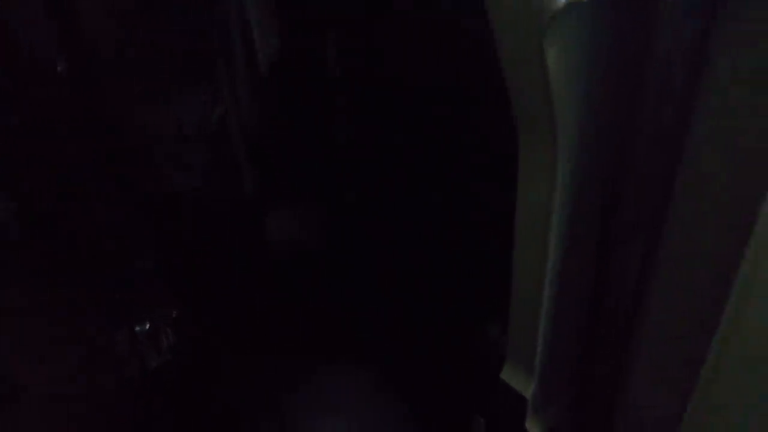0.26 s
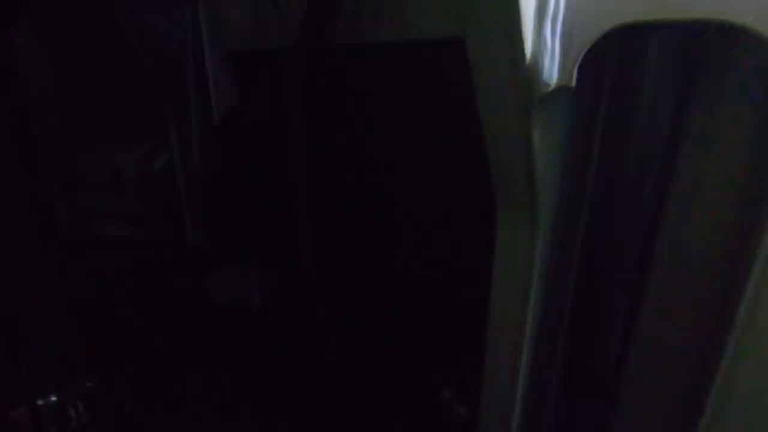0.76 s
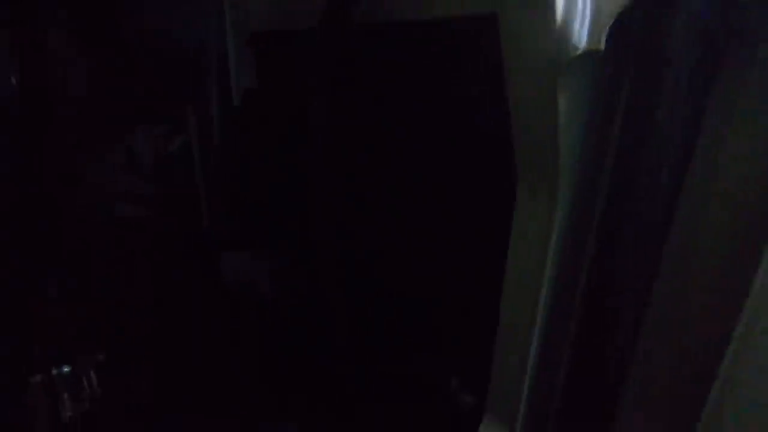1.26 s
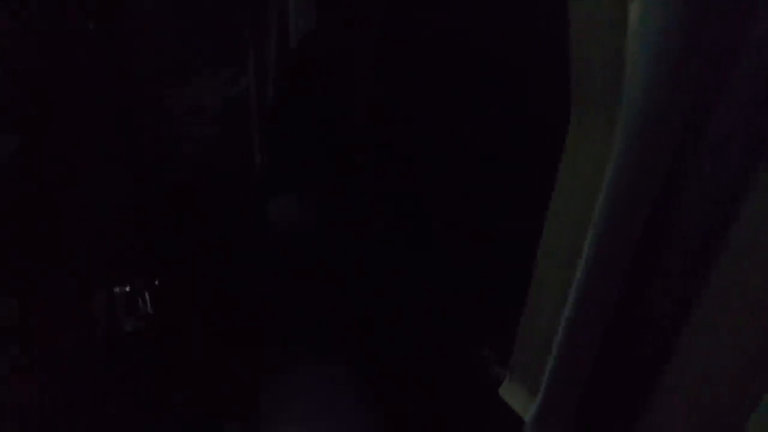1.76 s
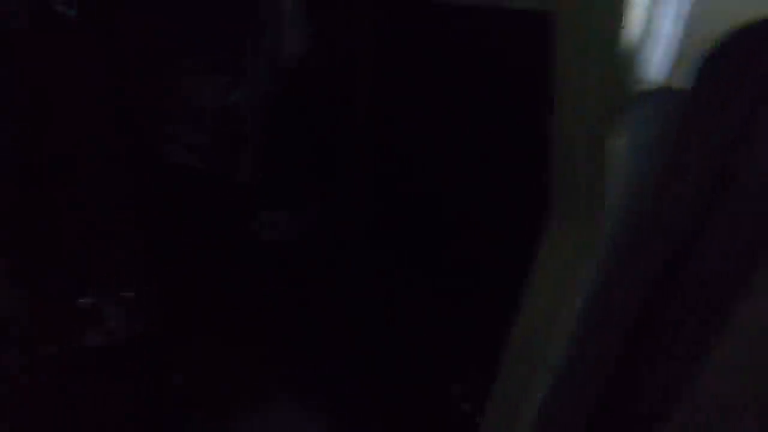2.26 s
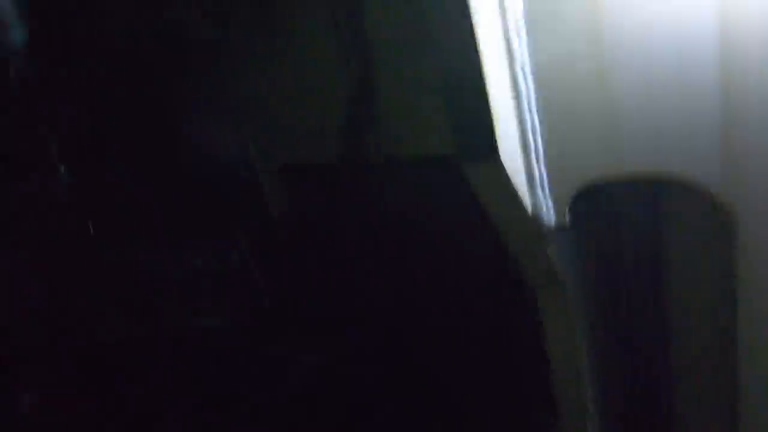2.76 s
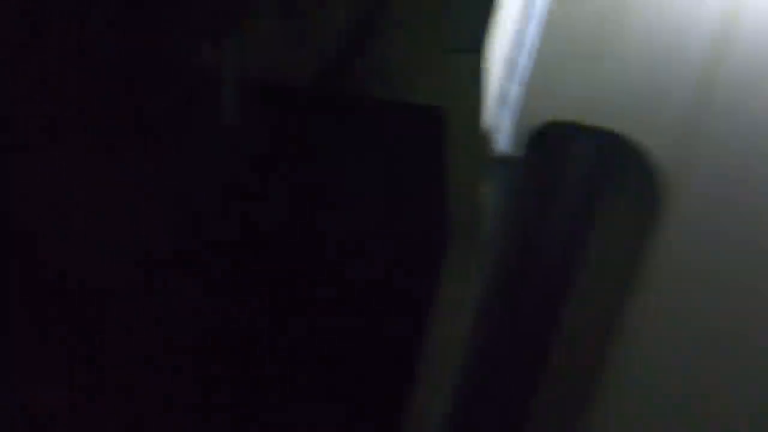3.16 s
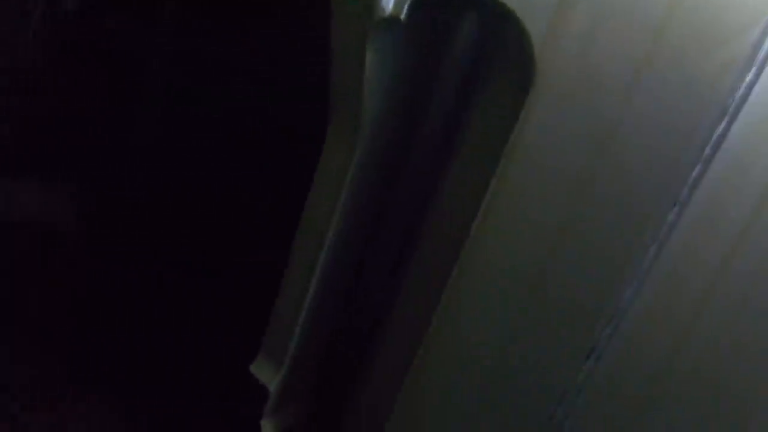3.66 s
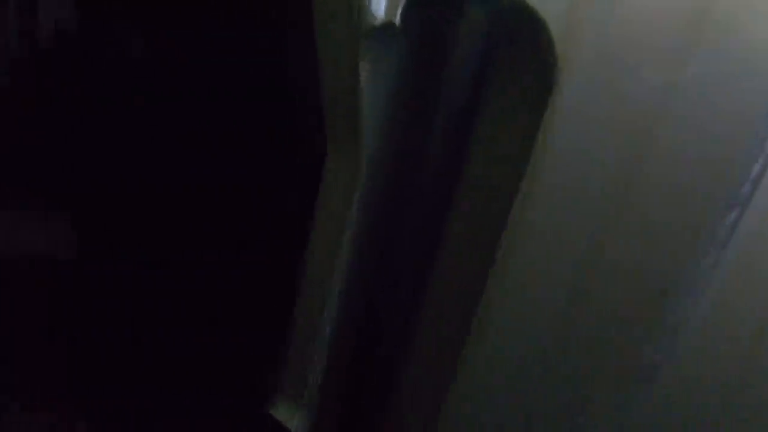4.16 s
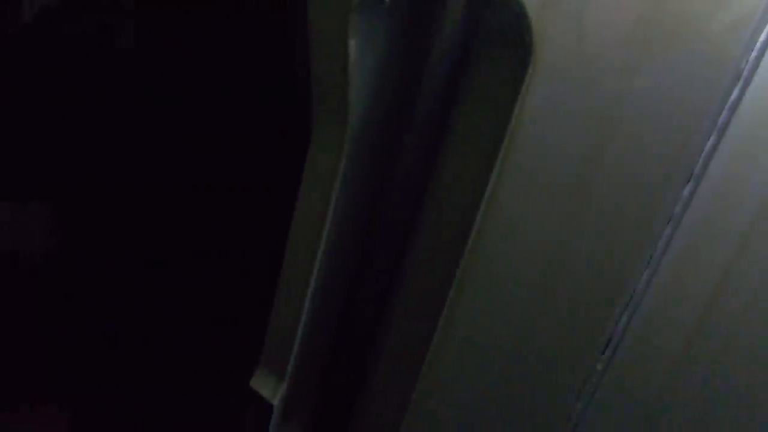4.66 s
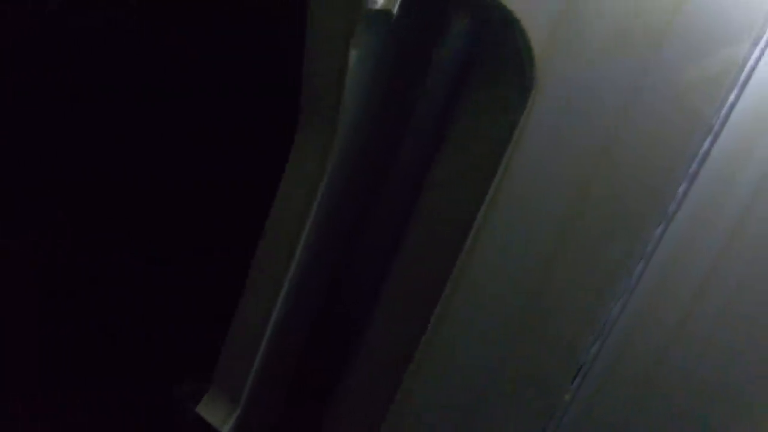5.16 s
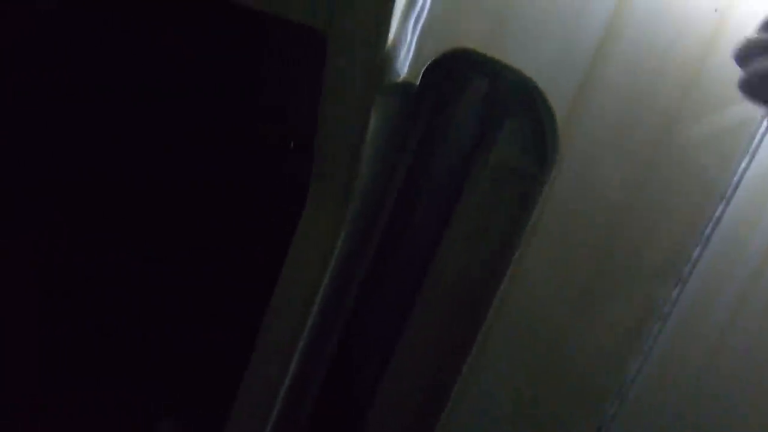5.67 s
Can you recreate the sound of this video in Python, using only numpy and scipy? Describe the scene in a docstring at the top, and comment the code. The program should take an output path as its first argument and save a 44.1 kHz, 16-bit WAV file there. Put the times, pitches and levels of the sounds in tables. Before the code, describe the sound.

Inside a ship's engine room, a diesel runs at constant speed with a strong, deep hum that booms through the steel. A slight throb and light clatter ride on it, along with humming machinery, droning fans, rumbling deck plates and roaring ventilation. Faint gear whine and a thin hiss of air sit above. As the microphone moves slowly through the room, single tones swell and fade while the main hum holds.

```python
"""Ship's engine room: a diesel at a steady 900 rpm, its firing tone booming through the steel hull.
Uneven cylinders add a throb and a clatter that repeats each cycle. Machinery hums, a fan drones, gears
whine, deck plates rumble, ventilation roars and leaking air hisses. The microphone moves slowly through
the room's standing waves, so single tones swell and fade."""
import sys
import numpy as np
from scipy import signal
from scipy.fft import rfft, irfft, next_fast_len
from scipy.io import wavfile
from scipy.ndimage import uniform_filter1d, minimum_filter1d, map_coordinates

SR = 44100
rng = np.random.default_rng(int(sys.argv[2]) if len(sys.argv) > 2 else 0)


def log_audio(samples):
    """Write samples as a 16-bit WAV file to the path given in sys.argv[1]."""
    # one column per channel
    frames = np.atleast_2d(samples).T
    # limit to full scale, then quantise
    limited = np.clip(frames, -1, 1)
    pcm = np.round(limited * 32767).astype(np.int16)
    wavfile.write(sys.argv[1], SR, pcm)


N = 261071
TIME_S = np.arange(N) / SR
FIRING_HZ, FIRINGS_PER_CYCLE = 89.88, 12
CYCLE_HZ = FIRING_HZ / FIRINGS_PER_CYCLE

# microphone path: t/s, position (0 = air leak and motor, 1 = fan duct)
MIC_PATH = [(0, 0.089), (.8, 0.037), (2.35, 0.8), (3.25, 0.6), (3.95, 0.74), (5.2, 1), (5.92, 1)]
# strong diesel lines: order (multiple of CYCLE_HZ), base level/dB
DIESEL_ORDERS = [(6, -53.5), (9, -49.6), (10, -57.4), (12, -23.9), (13, -55), (14, -59.5), (15, -46.2),
                 (18, -49.2), (19, -54.7), (21, -44), (22, -56), (27, -49.5), (32, -59), (33, -57.5),
                 (34, -55.3), (36, -52.5), (42, -57.6), (43, -59.5), (44, -60), (47, -58), (48, -56),
                 (50, -60.5), (52, -58.5), (54, -59.5), (58, -62), (66, -62.5), (89, -64)]
# nodes and antinodes along the path: t/s, lower order gain/dB, upper order gain/dB
STANDING_WAVE_GAINS = [(0, -3.5, -3), (.9, 2, 0), (1.75, -3, -5), (2.1, 2, -1), (2.6, -3.5, -4),
                       (3.15, -13, 2), (3.45, -5, 5), (3.75, -3, 3), (4.05, 1.5, 4.5), (4.55, 2.5, -3),
                       (4.9, 2, 4.5), (5.25, 3, 2), (5.7, -1.5, -3), (5.92, -3, -6)]
# hull plate booms: t/s, rise/dB
HULL_BOOMS = [(0.165, 7), (2.025, 6), (2.145, 7), (2.3, 7), (2.42, 7), (2.555, 9), (4.04, 5), (4.78, 6)]
# clatter spectrum: f/Hz, level per order/dB
CLATTER_SPECTRUM = [(20, -76), (70, -65), (200, -62.5), (380, -64), (480, -66), (620, -66.5), (850, -72),
                    (1100, -76), (1500, -82), (2200, -100), (4000, -130)]

# fan blade tone: t/s, level/dB
BLADE_LEVEL = [(0, -66), (.6, -57.5), (1.9, -60.5), (2.4, -56), (3.5, -54), (4.15, -50.5), (4.8, -53),
               (5.92, -57.5)]
# fan outlet rush: t/s, level/dB
OUTLET_RUSH_LEVEL = [(0, -58), (.6, -55), (1.9, -54.5), (2.6, -53.5), (2.9, -47.5), (3.4, -52.5),
                     (4.3, -52.5), (5.0, -52), (5.4, -66.5), (5.85, -54)]
# outlet resonances: f/Hz, width/Hz, gain/dB
OUTLET_MODES = [(455, 83, 0.5), (590, 90, -2.5), (753, 140, -0.5)]
# duct drone: t/s, level/dB
DUCT_DRONE_LEVEL = [(0, -55.5), (2.3, -56), (2.85, -55.5), (3.3, -47.5), (3.75, -55), (5.1, -45),
                    (5.92, -49)]
# duct resonances: f/Hz, width/Hz, gain/dB
DUCT_MODES = [(191, 32, -1.5), (380.4, 70, 6), (456, 27, -3.5), (496.6, 20, 0.5)]

# gear whines: f/Hz, gain/dB
GEAR_LINES = [(1668, 0), (1709, -4), (2213, -11), (1170, -8)]
# gear whine envelope: t/s, level/dB
GEAR_WHINE_LEVEL = [(0, -72), (.7, -69), (.9, -63.5), (1.35, -65), (1.6, -71), (5.2, -71), (5.55, -63.5),
                    (5.92, -69)]
# gear casing resonances: f/Hz, width/Hz, gain/dB
CASING_MODES = [(715, 35, 0.5), (990, 90, -3), (1200, 180, -1.5), (1600, 180, -6), (1760, 110, -9.5),
                (1960, 180, -8.5)]
# casing surges: t/s, half length/s, rise/dB
CASING_SURGES = [(0.885, 0.23, 8), (5.624, .2, 4)]
# steady machinery hum tones: f/Hz, level/dB
HUM_LINES = [(70.8, -59), (94.1, -54), (148.1, -56), (178.5, -51.5), (198.2, -54), (316.2, -51),
             (353.3, -55), (592.6, -61.5), (630, -64), (948.6, -67)]
# machinery rushes: t/s, half length/s, f/Hz, width/Hz, level/dB
RUSH_BANDS = [(.15, 0.5, 1230, 700, -54.5), (0.23, 0.18, 282, 100, -42.5), (0.498, .5, 715, 70.3, -52.5),
              (0.778, .22, 1145, 807, -57.5), (1.403, 1.1, 579, 110.6, -55.5), (1.95, 0.27, 223, 45, -47),
              (2.146, 0.17, 1170, 248, -54), (2.299, 0.48, 163.8, 26.2, -46.5),
              (2.848, 0.38, 286.4, 35, -46.5), (2.85, 0.23, 1220, 117.5, -57.5),
              (4.203, 0.54, 267, 99, -47.5), (4.899, .3, 850, 299, -56.5), (5.45, 0.27, 211.6, 45, -42.5),
              (5.802, .25, 1150, 890, -55.5)]

# deck plate rumble: t/s, level/dB
DECK_LEVEL = [(0, -42.5), (1.6, -51.5), (2.3, -53.5), (2.95, -58.5), (3.4, -48), (4.0, -39), (5.45, -46),
              (5.92, -54)]
# deck plate resonances: f/Hz, width/Hz, gain/dB
DECK_MODES = [(144, 15, 1.5), (174.3, 11, -2), (216, 57, 1)]
# rumble swells: t/s, half length/s, plate level/dB, sub-bass level/dB
DECK_SWELLS = [(0.183, 0.076, -38.5, -66.5), (2.02, 0.022, -41, -42), (2.556, 0.05, -35.5, -58),
               (2.999, 0.15, -54, -47)]
# sub-bass of the swells: f/Hz, width/Hz, gain/dB
SUB_BAND = [(32, 24, 0)]

# ventilation roar: f/Hz, relative density/dB
ROAR_SPECTRUM = [(15, -6.5), (35, -7.5), (65, 3), (120, 1), (230, -1), (290, -7), (380, -1.5), (440, -15.5),
                 (650, -11.5), (860, -14), (1000, -15), (1800, -22), (2800, -30), (4500, -72)]
# air hiss: f/Hz, relative density/dB
HISS_SPECTRUM = [(1200, -9), (2500, 6), (3700, 3.5), (4500, 0), (5300, 2), (6000, 1.5), (6780, -5.5),
                 (7050, -10), (8500, -20), (10200, -36), (10900, -44.5), (15000, -40.5)]
# hiss envelope: t/s, base level/dB
HISS_ENVELOPE = [(0.05, -64.5), (0.1, -64), (4.64, -66.5), (5.85, -66.5)]


def from_db(db):
    """Decibels to gain."""
    return 10 ** (np.asarray(db) / 20)


def unit_rms(x):
    """Scale to rms 1."""
    return x / np.sqrt(np.mean(x ** 2) + 1e-20)


def curve(rows, column=1):
    """One column of a time table at every sample."""
    columns = np.transpose(rows)
    return np.interp(TIME_S, columns[0], columns[column])


def spectrum_db(points, hz):
    """Interpolate a spectrum over log frequency."""
    knots_hz, levels_db = np.transpose(points)
    return np.interp(np.log(np.maximum(hz, 1)), np.log(knots_hz), levels_db)


def bump(centre_s, half_s):
    """Gaussian of height 1."""
    return np.exp(-((TIME_S - centre_s) / half_s) ** 2)


def mic_gain(leak_db, duct_db):
    """Gain sliding in dB between the two ends of the microphone path."""
    return from_db(leak_db + (duct_db - leak_db) * curve(MIC_PATH))


def drift(rate_hz, hop=100, settle=2000):
    """Slow random wander, spread 1."""
    pole = np.exp(-2 * np.pi * rate_hz * hop / SR)
    white = rng.standard_normal(N // hop + settle + 2)
    slow = signal.lfilter([1], [1, -2 * pole, pole * pole], white)[settle:]
    return np.interp(np.arange(N) / hop, np.arange(len(slow)), unit_rms(slow - slow.mean()))


def tone(hz, wander_hz, waver_db):
    """Rotating machine's line, wavering in speed and level; rms 1."""
    turns = np.cumsum(hz + wander_hz * drift(2.0)) / SR + rng.random()
    return unit_rms(np.sin(2 * np.pi * turns) * from_db(waver_db * drift(0.71)))


def resonate(modes):
    """Resonances driven by random vibration; rms 1."""
    out = np.zeros(N)
    for hz, width_hz, db in modes:
        band = signal.butter(2, [hz - width_hz / 2, hz + width_hz / 2], "band", fs=SR, output="sos")
        out += from_db(db) * unit_rms(signal.sosfilt(band, rng.standard_normal(N)))
    return unit_rms(out)


def room_noise(spectrum, ripple_db, spacing_hz):
    """Turbulent noise, its spectrum rippled by standing waves; rms 1."""
    size = next_fast_len(N)
    hz = np.arange(size // 2 + 1) * SR / size
    white = rfft(rng.standard_normal(size))
    ripple = np.interp(hz / spacing_hz, np.arange(N), rng.standard_normal(N))
    colour = from_db(spectrum_db(spectrum, hz) + ripple_db * ripple)
    return unit_rms(irfft(white * colour, size)[:N])


def engine_cycles(speed_spread):
    """Four-stroke cycles elapsed under a tight governor."""
    return rng.random() + np.cumsum(CYCLE_HZ * (1 + speed_spread * drift(0.91))) / SR


def diesel_hum(cycles, throb_orders=(9, 12, 15), thud_orders=(15, 18, 21), thud_lead_cycles=0.125):
    """Firing tone plus orders of uneven cylinders; phase-aligned groups throb and thud."""
    hull_db = sum(db * bump(at_s, half_s=0.028) for at_s, db in HULL_BOOMS)
    extra_db = {21: curve(STANDING_WAVE_GAINS, 1) + hull_db,  # a hull plate is tuned to this order
                27: curve(STANDING_WAVE_GAINS, 2)}
    out = np.zeros(N)
    for order, level_db in DIESEL_ORDERS:
        gain = from_db(level_db + extra_db.get(order, 0))
        phase_turns = rng.random()
        if order in throb_orders:
            phase_turns = 0
        if order in thud_orders:
            phase_turns = thud_lead_cycles * (order - thud_orders[0])
        out += np.sqrt(2) * gain * np.cos(2 * np.pi * (order * cycles + phase_turns))
    return out


def diesel_clatter(cycles, size=4096):
    """Valve and injector knocks, smeared by the room into a per-cycle pattern varying with position."""
    orders = np.arange(size // 2 + 1)
    weak = ~np.isin(orders, np.round(np.array(DIESEL_ORDERS)[:, 0])) & (orders > 0)
    colour = from_db(spectrum_db(CLATTER_SPECTRUM, orders * CYCLE_HZ)) * weak
    phasors = np.exp(2j * np.pi * rng.random((2, len(orders))))
    patterns = irfft(colour * phasors, size) * size / np.sqrt(2)
    at_leak, at_duct = (map_coordinates(p, [cycles % 1 * size], mode="grid-wrap") for p in patterns)
    blend_rad = curve(MIC_PATH) * np.pi / 2
    return np.cos(blend_rad) * at_leak + np.sin(blend_rad) * at_duct


def shaft():
    """Low hum at the rotation rate, louder by the motor."""
    return mic_gain(-42.5, -49.5) * tone(hz=59.2, wander_hz=0.056, waver_db=0.5)


def fan():
    """Blade tone, air rushing from the outlet and duct drone."""
    blades = from_db(curve(BLADE_LEVEL)) * tone(hz=478.4, wander_hz=0.5, waver_db=0.7)
    outlet = from_db(curve(OUTLET_RUSH_LEVEL)) * resonate(OUTLET_MODES)
    duct = from_db(curve(DUCT_DRONE_LEVEL)) * resonate(DUCT_MODES)
    return blades + outlet + duct


def gearbox(surge_db):
    """Thin gear whines and a ringing casing that surges briefly."""
    whine = sum(from_db(db) * tone(hz, wander_hz=2.5, waver_db=1.5) for hz, db in GEAR_LINES)
    casing = from_db(surge_db) * mic_gain(-61.5, -60.5) * resonate(CASING_MODES)
    return from_db(curve(GEAR_WHINE_LEVEL)) * whine + casing


def machinery_hum():
    """Steady machinery hum tones, each wavering slightly."""
    return sum(from_db(db) * tone(hz, wander_hz=0.35, waver_db=2.0) for hz, db in HUM_LINES)


def machinery_rush():
    """Noise bands that swell and fade."""
    return sum(bump(at_s, half_s) * from_db(db) * resonate([(hz, width_hz, 0)])
               for at_s, half_s, hz, width_hz, db in RUSH_BANDS)


def deck_rumble():
    """Resonating deck plates, with brief swells that add sub-bass."""
    rumble = from_db(curve(DECK_LEVEL)) * resonate(DECK_MODES)
    plates, sub = resonate(DECK_MODES), resonate(SUB_BAND)
    swells = sum(bump(at_s, half_s) * (from_db(plate_db) * plates + from_db(sub_db) * sub)
                 for at_s, half_s, plate_db, sub_db in DECK_SWELLS)
    return rumble + swells


def ventilation(surge_db, surge_share=0.13):
    """Turbulent roar, rising slightly with the gearbox surges."""
    gain = mic_gain(-39, -40) * from_db(surge_share * surge_db)
    return gain * room_noise(ROAR_SPECTRUM, ripple_db=3, spacing_hz=14)


def air_leak(gain_db=5.5):
    """Near-steady hiss of escaping air."""
    gain = from_db(curve(HISS_ENVELOPE) + gain_db)
    return gain * room_noise(HISS_SPECTRUM, ripple_db=1.7, spacing_hz=6)


def scene():
    """Diesel, machinery, deck and air at the moving microphone; mono."""
    surge_db = sum(db * bump(at_s, half_s) for at_s, half_s, db in CASING_SURGES)
    cycles = engine_cycles(speed_spread=0.00028)
    diesel = mic_gain(0.5, -0.15) * diesel_hum(cycles) + diesel_clatter(cycles)
    machinery = shaft() + fan() + gearbox(surge_db) + machinery_hum() + machinery_rush()
    return (diesel + machinery + deck_rumble() + ventilation(surge_db) + air_leak())[None]


def record(dry):
    """Fast limiter on the highest crests, then a low-pass."""
    threshold_db, excess_share, trim_db = -18.5, 0.4, -0.07
    window_samples, cutoff_hz = 490, 14800
    crest_db = 20 * np.log10(1e-9 - minimum_filter1d(-np.abs(dry), window_samples))
    cut_db = uniform_filter1d(excess_share * np.maximum(crest_db - threshold_db, 0), window_samples)
    lowpass = signal.butter(8, cutoff_hz, fs=SR, output="sos")
    return signal.sosfiltfilt(lowpass, dry * from_db(trim_db - cut_db))


dry = scene()
out = record(dry)
log_audio(out)
```